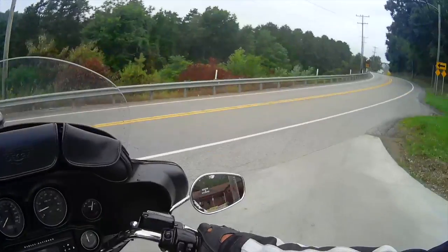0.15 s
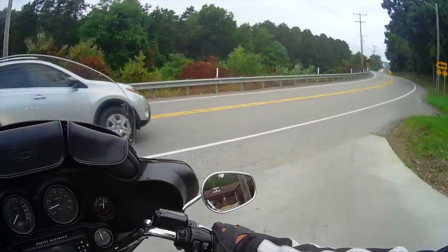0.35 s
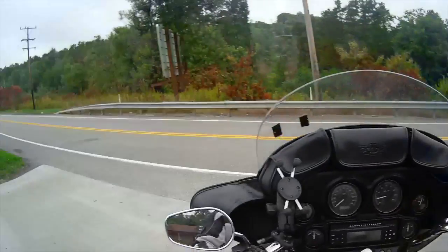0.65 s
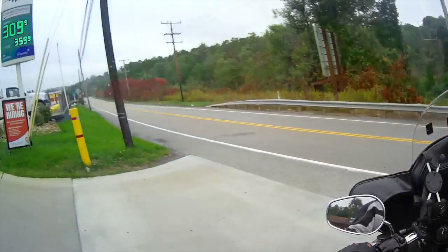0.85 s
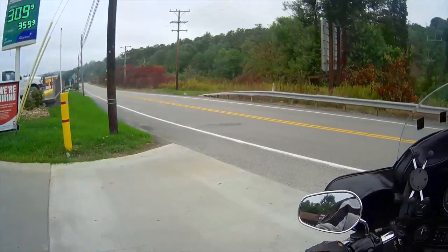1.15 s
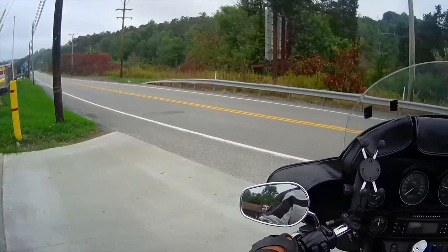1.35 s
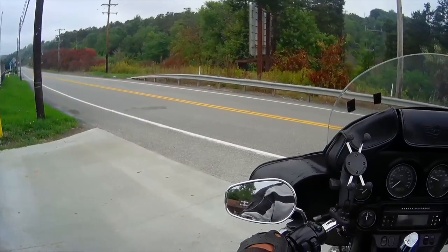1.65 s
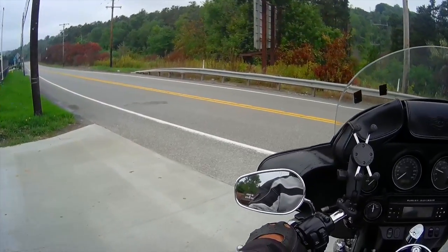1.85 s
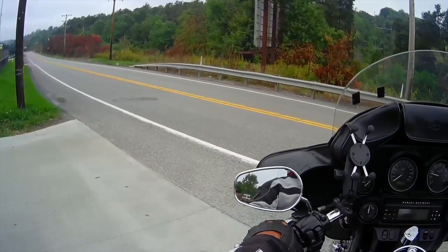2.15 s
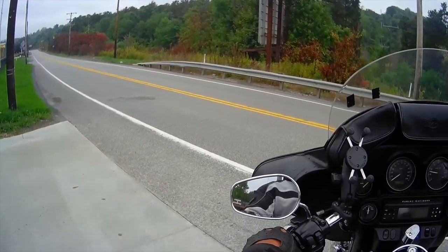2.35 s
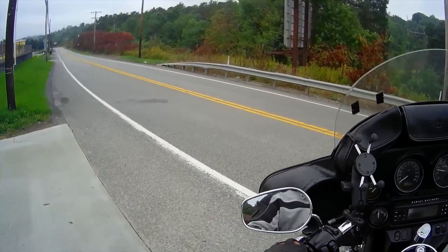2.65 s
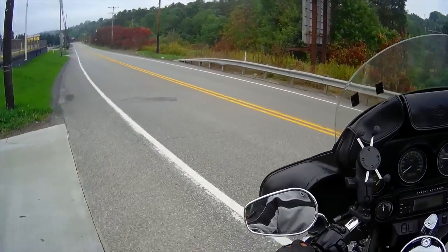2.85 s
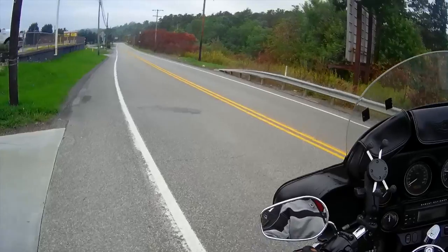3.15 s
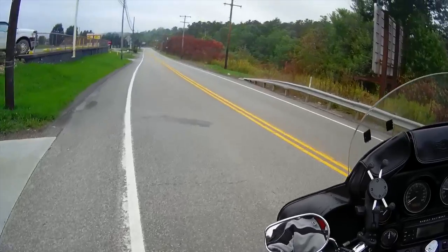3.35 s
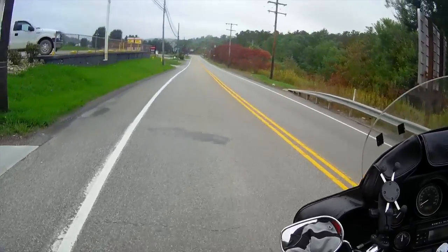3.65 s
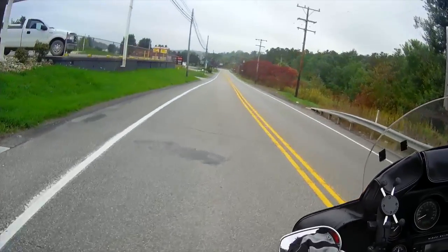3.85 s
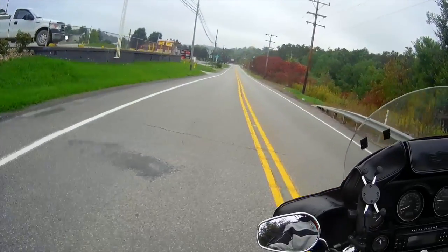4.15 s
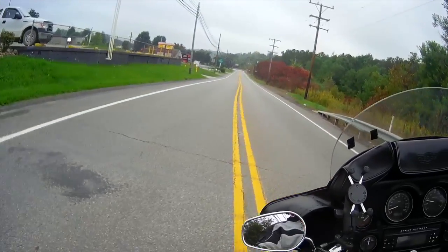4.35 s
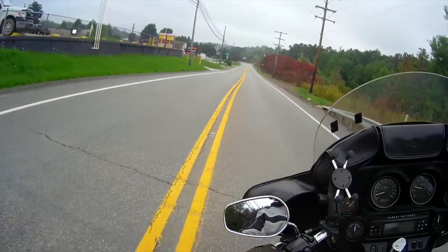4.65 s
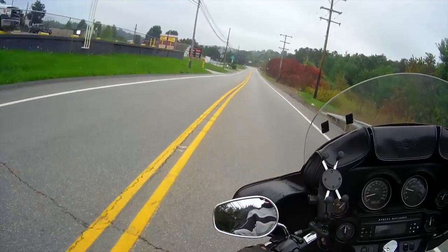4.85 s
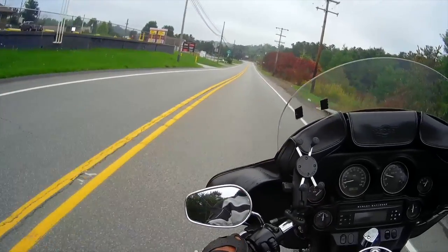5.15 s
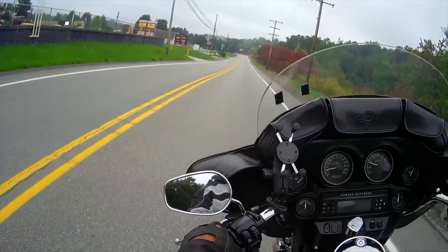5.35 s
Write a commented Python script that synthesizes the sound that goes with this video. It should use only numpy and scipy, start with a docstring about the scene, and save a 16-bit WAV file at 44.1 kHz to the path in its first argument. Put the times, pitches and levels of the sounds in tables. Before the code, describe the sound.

Close, mono, open-air sound from a rider's helmet beside a road. For the first 0.8 seconds a big twin-cylinder motorcycle idles with soft, low, unevenly spaced puffs over a faint wash of traffic; a car's tyres swell and fade around 0.7, and one firing stumbles near 0.64 with a small tick. From about 0.88 to 1.1 six hard thumps burst out with cracks and metallic ring as the clutch bites and the revs jump. The exhaust dips at 1.2, then roars fuller to a peak around 1.5-1.8 with rough blats. By 2 it relaxes to a lower throb with clatter and grainy valve hiss, swelling again near 3. Dull knocks appear around 2.8, 4.4 and 5. A strong wind thump hits at 4.2, followed by low buffeting that slowly fades. From 5.2 to 5.5 the engine climbs, louder and raspier.

```python
"""On the road, at a rider's helmet: a big V-twin motorcycle idles, coughs, slips its clutch and pulls away.
Uneven firings ring resonances of the exhaust pipe, and bursts of noise add rasp, cracks and rough blats.
Shaped noise in step with the crank makes the clatter and valve hiss; short bursts make ticks and knocks.
Behind them are a wash of traffic, a car's tyres that swell and fade, and a low rumble of shaped noise
that thickens as the engine takes up load, with rough air and gusts of wind later on."""
import sys
import numpy as np
from scipy import signal
from scipy.fft import rfft, irfft, next_fast_len
from scipy.io import wavfile
from scipy.ndimage import uniform_filter1d, map_coordinates

SR = 44100
rng = np.random.default_rng(int(sys.argv[2]) if len(sys.argv) > 2 else 0)


def generate_wav(sig):
    """Save sig (samples, or channels by samples) to the path in sys.argv[1] as 16-bit PCM at SR."""
    pcm = np.round(np.clip(np.atleast_2d(sig).T, -1, 1) * 32767).astype(np.int16)
    wavfile.write(sys.argv[1], SR, pcm)


N = 242417

# How fast the crank turns: (time [s], speed [rpm])
CRANK_SPEED = [(0.0, 999.0), (0.88, 1010.0), (0.98, 1626.0), (1.1, 1593.0), (1.24, 1769.0), (1.41, 1756.0),
               (1.66, 1947.0), (1.82, 1906.0), (2.12, 1529.0), (2.41, 1664.0), (2.93, 1750.0),
               (3.49, 1641.0), (4.02, 1672.0), (4.47, 1793.0), (4.86, 1782.0), (5.32, 1976.0),
               (5.5, 2122.0)]
# Hard firings as the throttle opens: (time [s], thump level [dB], crack level [dB])
HARD_FIRINGS = [(0.876, -30, -52.5), (0.936, -23, -42.5), (0.977, -23.5, -41), (1.015, -24, -41.5),
                (1.046, -24.5, -54), (1.083, -24.5, -48.5)]
# Treble colour of the valve gear and the control ticks: (frequency [Hz], relative level [dB])
TREBLE_COLOUR = [(1500, -40), (3000, -5), (3600, -12), (4700, -4.5), (6600, -6), (6950, -0.5), (7500, -2),
                 (7850, 4), (8700, 0), (9200, 1), (10300, -2), (11000, -4.5), (13200, -10.5), (15000, -23)]


def exhaust(times, sizes):
    """Soft puffs lope at idle; under load they sharpen and ring the higher pipe resonances."""
    # Pipe resonances while the engine carries no load: (frequency [Hz], width [Hz], relative level [dB])
    idle_modes = [(43.5, 9, 0), (62, 14, -2), (85, 16, -3), (118, 22, -9), (152, 30, -18), (195, 40, -27)]
    # Pipe resonances under load: (frequency [Hz], width [Hz], relative level [dB])
    load_modes = [(44.3, 2.3, -13), (67.5, 30.7, 0.5), (92.2, 35.5, -2.5), (121.7, 11.7, -2),
                  (179.3, 17.3, -8.5), (197.4, 7.3, -8), (238.6, 40, -18), (261.4, 16.6, -18),
                  (406, 20, -28.5)]
    # Loudness of the low boom: (throttle shut [dB], wide open [dB])
    boom_range = (-40.5, -27.5)
    # Loudness of the bark above it: (throttle shut [dB], wide open [dB])
    bark_range = (-52.5, -38)
    stumble_s, stumble_db = .64, -9  # the idle stumbles: one weak firing, and how far it drops
    lope_over_boom_db = -0.5
    soft_hz = 220  # idle puffs are soft and hold little above this

    def nearest(s):
        return np.argmin(abs(times - s))

    load = clutch(times)
    rpm = at(CRANK_SPEED, times)
    # the boom fills out early, the bark keeps growing
    boom_db = driven(boom_range, np.sqrt(throttle(times)))
    bark_db = driven(bark_range, throttle(times))
    boom_db[nearest(stumble_s)] += stumble_db
    for s, thump_db, _ in HARD_FIRINGS:
        boom_db[nearest(s)] = thump_db
    sizes = sizes / np.sqrt(rpm / np.mean(rpm))  # slower firings are each larger

    def ring(modes, gains, band, edge_hz, in_step=False):
        def play(gain):
            return filtered(pipe(spikes(times, sizes * gain), modes, edge_hz, in_step), band)
        return play(gains) / np.std(play(0.98))  # loudness relative to firings of constant gain

    def low(f):
        return 1 / (1 + (f / 150) ** 12)

    def high(f):
        return 1 - low(f)

    def soft(f):
        return 1 / (1 + 1j * f / soft_hz) ** 2

    lope_gains = amp(boom_db + lope_over_boom_db) * (1 - load)
    lope = ring(idle_modes, lope_gains, soft, edge_hz=120, in_step=True)
    boom = ring(load_modes, amp(boom_db) * load, low, edge_hz=1050)
    bark = ring(load_modes, amp(bark_db) * np.sqrt(load), high, edge_hz=346)
    idle_sound = round_trips(lope, delay=.02, bounce=-0.77)
    return idle_sound + round_trips(boom + bark, delay=.0115, bounce=0.69)


def pipe(x, modes, edge_hz, in_step):
    """Ring x through resonances, in step or with alternating sign; the muffler rolls off above edge_hz."""
    sign = 1 if in_step else -1

    def response(f):
        total = 0
        for k, (centre, width, db) in enumerate(modes):
            damping = 1j * f * width
            total = total + sign ** k * amp(db) * damping / (centre * centre - f * f + damping)
        muffler = 1 + np.sqrt(2) * 1j * f / edge_hz - (f / edge_hz) ** 2
        return total / muffler

    return filtered(x, response)


def round_trips(x, delay, bounce):
    """A pulse runs up and down the pipe in delay seconds, and part of it leaves at each return."""
    def response(f):
        trip = np.exp(-2j * np.pi * f * delay)
        return (trip - bounce) / (1 - bounce * trip)
    return filtered(x, response)


def crank():
    """Four-stroke cycles turned so far, two revolutions each."""
    return np.cumsum(at(CRANK_SPEED, clock())) / (120 * SR) - .35


def moments(cycles, place):
    """Times at which the crank passes a place (0-1) in its cycle."""
    passes = np.arange(np.ceil(cycles[0] - place), cycles[-1] - place) + place
    return np.interp(passes, cycles, clock())


def firings(cycles, rear_db, scatter_db, jitter):
    """Times and sizes of the firings: the rear cylinder follows the front one after a long gap."""
    front = moments(cycles, 0)
    rear = moments(cycles, .58)
    times = np.r_[front, rear]
    chance = rng.standard_normal((len(times), 2))
    level_db = np.r_[np.zeros(len(front)), np.full(len(rear), rear_db)]
    sizes = amp(level_db + scatter_db * chance[:, 0])
    times = times + jitter * chance[:, 1]  # jitter [s]
    for s, _, _ in HARD_FIRINGS:  # the nearest firing moves to the time of each hard one
        times[np.argmin(abs(times - s))] = s
    return times, sizes


def throttle(t):
    """How far the throttle is open, which drives the loudness of the engine sounds."""
    # The throttle over time: (time [s], opening [0-1])
    opening = [(0, 0.07), (.8, 0.03), (.95, 0.82), (1.07, 0.69), (1.18, 0.2), (1.3, 0.61), (1.56, 0.96),
               (1.78, 0.85), (1.93, .22), (2.6, 0.19), (3.0, 0.49), (3.45, 0.37), (3.9, 0.5), (4.22, 0.16),
               (4.45, 0.56), (4.82, 0.46), (5.2, 0.68), (5.45, 1)]
    return at(opening, t)


def clutch(t):
    """Share of the load that the engine carries as the clutch bites, rising smoothly."""
    bite_s, slip_s, full_load = 0.777, 0.32, 0.94  # first bite, settling time, final share
    return full_load * (1 - np.exp(-np.maximum(t - bite_s, 0) / slip_s))


def revs(t):
    """Crank speed in octaves above idle: each doubling of the revs adds one."""
    idle_rpm = 1000
    return np.log2(at(CRANK_SPEED, t) / idle_rpm)


def driven(levels, opening):
    """Level in dB between its shut and wide-open values."""
    shut_db, open_db = levels
    return shut_db + (open_db - shut_db) * opening


def gas(times, sizes):
    """Each firing drives a turbulent puff from the pipe; the hard ones crack and ring the metal."""
    # Loudness of the rasp: (throttle shut [dB], wide open [dB])
    rasp_range = (-63.5, -50.5)
    # Colour of the rasp: (frequency [Hz], relative level [dB])
    rasp_colour = [(200, -29), (280, 1.5), (335, -15), (395, -3), (470, -11), (570, -7), (800, -15),
                   (1500, -21.5), (4000, -38.5)]
    # Colour of the cracks: (frequency [Hz], relative level [dB])
    crack_colour = [(200, 3), (500, -5.5), (850, 4.5), (1150, -3), (1400, -43), (2500, -21), (6000, -45)]
    # Metal ring of a hard firing: (frequency [Hz], relative level [dB], time to fall 60 dB [s])
    ring_modes = [(600, -11, .014), (790, -7, .016), (930, -4, .018), (1120, -2, .024)]
    puffs = unit(.7 + bursts(times, sizes, life=.007))
    rasp_db = driven(rasp_range, throttle(clock()) ** 2)  # the rasp comes late, near full throttle
    rasp = amp(rasp_db) * puffs * noise(rasp_colour)

    s, _, crack_db = np.transpose(HARD_FIRINGS)
    t = np.arange(SR // 10) / SR
    ring = sum(amp(db - 60 * t / t60) * np.sin(2 * np.pi * hz * t) for hz, db, t60 in ring_modes)
    metal = signal.fftconvolve(spikes(s, amp(crack_db)), ring)[:N]
    cracks = bursts(s, amp(crack_db), life=0.0028) * noise(crack_colour)
    return rasp + metal + cracks


def shake(cycles):
    """The unbalanced crank rocks the frame once per revolution, harder as it spins faster."""
    idle_db, db_per_octave = -57, 8  # level at idle speed, and its rise as the revs double
    rocking = np.sqrt(2) * np.sin(4 * np.pi * cycles)
    return amp(idle_db + db_per_octave * revs(clock())) * rocking


def clatter(times, sizes):
    """Pistons and gears churn, louder with throttle, slightly softer with revs, harder at every firing."""
    # Loudness at idle speed: (throttle shut [dB], wide open [dB])
    clatter_range = (-65.5, -59)
    # Colour of the churn: (frequency [Hz], relative level [dB])
    clatter_colour = [(150, -40), (330, -14), (450, -2.5), (620, -1.5), (730, -8), (835, 4), (940, -9),
                      (1120, 0), (1280, -3), (1600, 0.5), (2200, -4.5), (2750, -12.5), (3100, -10.5),
                      (15000, -45)]
    db_per_octave = -1.5  # change as the revs double
    t = clock()
    beat = unit(1.7 + bursts(times, sizes, life=0.00098))
    level_db = driven(clatter_range, throttle(t)) + db_per_octave * revs(t)
    return amp(level_db) * beat * noise(clatter_colour)


def valves(cycles, steady, scatter_db, grain_db):
    """The valve gear gives grainy bursts of treble at fixed places in the cycle, over a steady hiss."""
    # Bursts in each cycle: (place in the cycle [0-1], length [cycles], relative level [dB])
    valve_bursts = [(0.84, 0.088, -2.5), (0.09, 0.13, -2), (0.36, 0.12, -7.5), (0, 0.03, -29)]
    # Loudness of the valve gear: (time [s], level [dB])
    hiss_level = [(0, -79), (.8, -73), (.95, -57.5), (1.25, -63), (1.6, -58), (2.2, -63), (2.85, -58.5),
                  (3.6, -62), (5.0, -62), (5.4, -58.5)]
    gate = steady
    for place, length, db in valve_bursts:
        times = moments(cycles, place)
        heights = amp(db + scatter_db * rng.standard_normal(len(times)))
        gate = gate + bursts(times, heights, life=length * np.mean(np.diff(times)) / 2)
    grains = rng.standard_normal(N) * amp(grain_db * wobble(860))
    return amp(at(hiss_level, clock())) * coloured(gate * grains, TREBLE_COLOUR)


def fairing(x, wet, life):
    """Close reflections from fairing and windscreen colour the sound and fade at a rate set by life [s]."""
    t = np.arange(SR // 20) / SR
    tail = rng.standard_normal(len(t)) * np.exp(-t / life)
    reflections = signal.fftconvolve(x, tail / np.linalg.norm(tail))[:N]
    return (x + wet * reflections) / np.hypot(1, wet)


def blats_and_rattles():
    """Short noise bursts: bright control ticks, rough exhaust blats near full throttle, a few dull knocks."""
    # Sharp ticks of the controls: (time [s], level [dB])
    control_ticks = [(0.6314, -57.5), (0.9597, -61), (1.039, -53), (1.9699, -54)]
    # Short rough blats of exhaust at hard firings near full throttle, then a few dull knocks:
    # (time [s], level [dB])
    blats_then_knocks = [(1.538, -36), (1.6, -46), (1.723, -36.5), (1.775, -37.5), (2.787, -43.5),
                         (2.813, -50), (2.839, -44), (4.36, -42), (4.72, -54), (5.002, -40.5),
                         (5.057, -44.5)]
    # Dull colour of the blats and knocks: (frequency [Hz], relative level [dB])
    dull_colour = [(120, -30), (240, 10.5), (330, -4.5), (450, -5.5), (600, -10), (850, -34), (2000, -32),
                   (5000, -46)]
    s, db = np.transpose(control_ticks)
    ticks = bursts(s, amp(db), life=.002) * noise(TREBLE_COLOUR)
    s, db = np.transpose(blats_then_knocks)
    blats_and_knocks = bursts(s, amp(db), life=0.0062) * noise(dull_colour)
    return ticks + blats_and_knocks


def rumble_and_wind():
    """Low rumble thickens as the engine takes up load; later, rough air and gusts hit the microphone."""
    # Colour of the rumble and wind: (frequency [Hz], relative level [dB])
    low_colour = [(4, -4), (12, -8), (26, -5), (48, -6), (75, -7.5), (150, -21), (400, -46), (1000, -105)]
    # Strongest slaps of wind: (time [s], level [dB])
    slaps = [(4.0, -36), (4.178, -22), (4.3, -35), (4.54, -59), (4.74, -32.5), (5.08, -32)]
    low_rumble_db = -45.5  # a faint, steady low rumble under the engine
    load_rumble_db, rough_air_db = -43.5, -31  # rumble added under load, and the later rough air
    slap_width_s = 0.027
    rough_start_s, attack_s, hold_s, release_s = 4.15, 0.24, 0.33, 0.95
    t = clock()
    corners = rough_start_s + np.cumsum([0, attack_s, hold_s, release_s])
    rough = amp(rough_air_db) * np.interp(t, corners, [0, 1, 1, 0])
    gusts = sum(amp(db) * np.exp(-((t - s) / slap_width_s) ** 2) for s, db in slaps)
    rumble = amp(low_rumble_db) + amp(load_rumble_db) * clutch(t)
    low_noise = noise(low_colour)
    # even out the loud and quiet stretches of the noise
    low_noise = low_noise / np.sqrt(.15 + abs(uniform_filter1d(low_noise ** 2, SR // 20)))
    return (rumble + rough + gusts) * low_noise


def roadside():
    """A steady wash of traffic, and the tyre noise of a car that swells and fades as it goes by."""
    # Colour of the traffic: (frequency [Hz], relative level [dB])
    traffic_colour = [(60, -44), (200, -12), (300, -9.5), (420, -7.5), (520, -2.5), (650, -1.5),
                      (775, -2.5), (1010, -6), (1310, -21), (1730, -15), (2140, -24), (3860, -19.5),
                      (12500, -20), (15000, -36)]
    # Colour of the car's tyres: (frequency [Hz], relative level [dB])
    tyre_colour = [(400, 6), (700, -13), (1200, 3), (1900, 9), (2500, 2), (3300, -11)]
    passing = 1 / (1 + ((clock() - .7) / 0.22) ** 2)  # loudest at 0.7 s
    traffic = amp(-60.5) * noise(traffic_colour)
    return traffic + amp(-63.5) * passing * noise(tyre_colour)


def amp(db):
    """Decibels to gain."""
    return 10 ** (np.asarray(db) / 20)


def unit(x):
    """Scale to rms 1."""
    return x / np.sqrt(np.mean(x ** 2) + 1e-20)


def clock():
    """Time of every sample in seconds."""
    return np.arange(N) / SR


def at(curve, t):
    """Value of a (time, value) curve at times t."""
    return np.interp(t, *np.transpose(curve))


def wobble(rate):
    """A smooth random curve through rate random points a second."""
    points = rng.standard_normal(int(N * rate / SR) + 4)
    return map_coordinates(points, [np.arange(N) * rate / SR])


def filtered(x, response):
    """x times a complex response of frequency."""
    m = next_fast_len(N + SR // 2)
    return irfft(rfft(x, m) * response(np.fft.rfftfreq(m, 1 / SR)), m)[:N]


def coloured(x, spectrum):
    """x shaped by (frequency, level) points on a log axis, at rms 1."""
    f, db = np.transpose(spectrum)
    return unit(filtered(x, lambda hz: amp(np.interp(np.log(hz + 1), np.log(f), db))))


def noise(spectrum):
    """Fresh coloured noise of rms 1."""
    return coloured(rng.standard_normal(N), spectrum)


def spikes(times, sizes):
    """One impulse at each time."""
    places = np.clip(np.round(times * SR).astype(int), 0, N - 1)
    return np.bincount(places, sizes, N)


def bursts(times, sizes, life):
    """Envelope that rises from each time, peaks after life seconds and fades."""
    u = np.arange(SR // 4) / SR / life
    return signal.fftconvolve(spikes(times, sizes), u * np.exp(1 - u))[:N]


def scene():
    """All sources at the rider's helmet."""
    cycles = crank()
    times, sizes = firings(cycles, rear_db=-2.5, scatter_db=.55, jitter=.00008)
    metal = clatter(times, sizes) + valves(cycles, steady=0.56, scatter_db=3.0, grain_db=0.5)
    metal = fairing(metal, wet=.25, life=.006)
    engine = exhaust(times, sizes) + shake(cycles) + gas(times, sizes) + metal
    return (engine + blats_and_rattles() + roadside() + rumble_and_wind())[None]


def record(dry):
    """The microphone channel keeps nothing above its band limit."""
    top_hz = 15150
    return filtered(dry[0], lambda hz: hz < top_hz)[None]


dry = scene()
out = record(dry)
generate_wav(out)
```